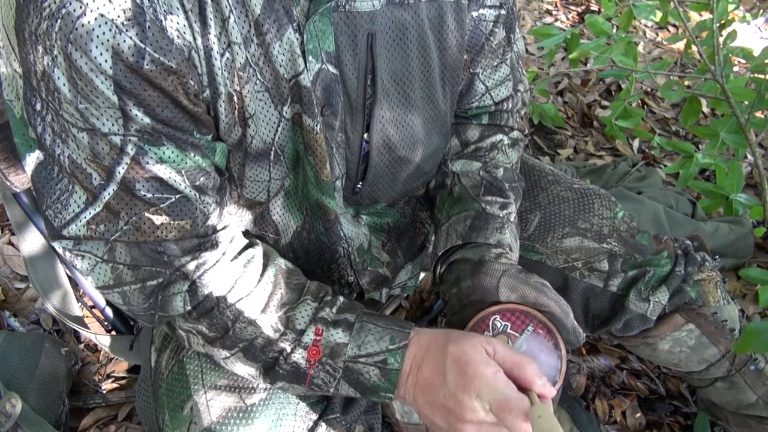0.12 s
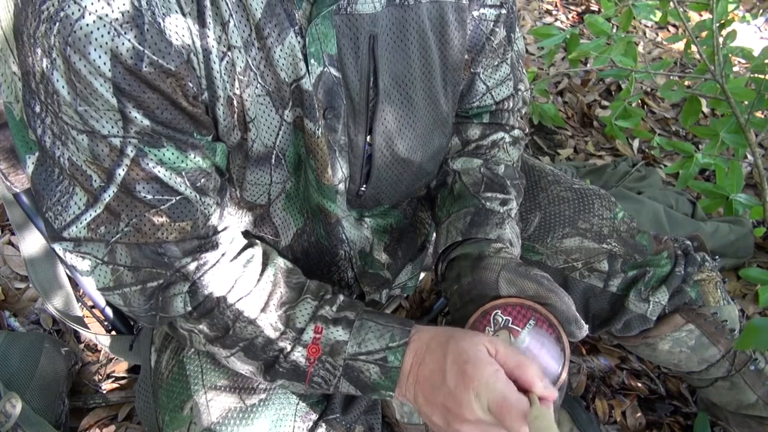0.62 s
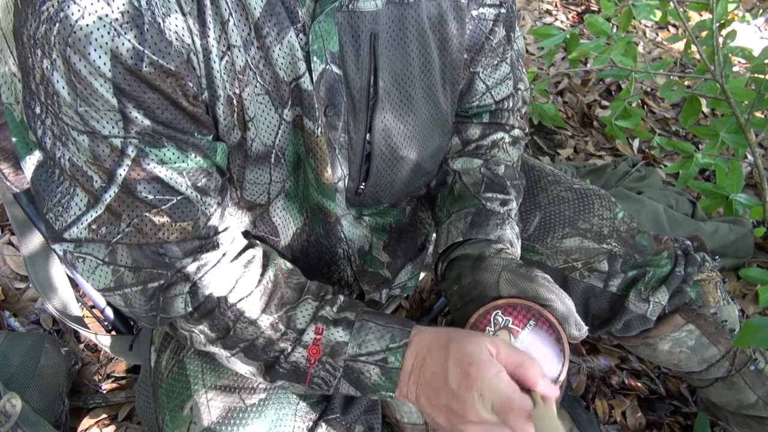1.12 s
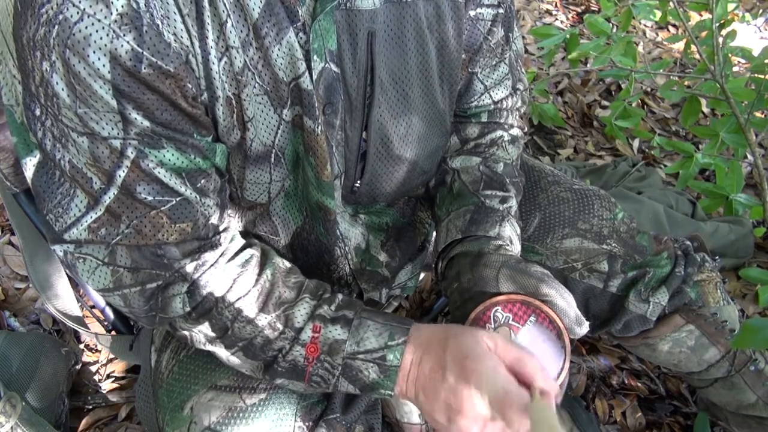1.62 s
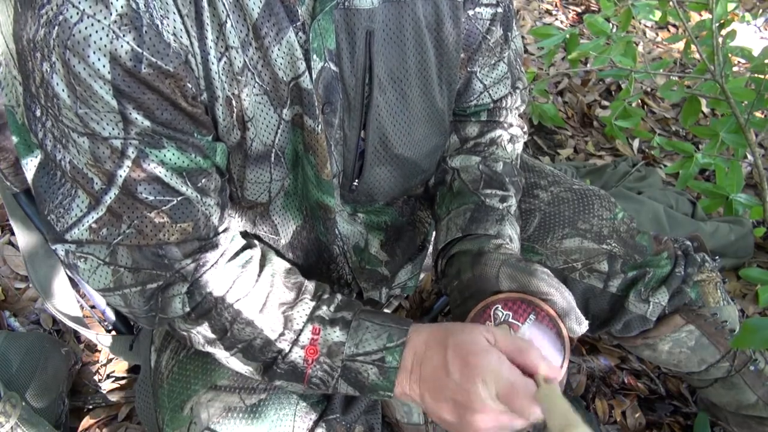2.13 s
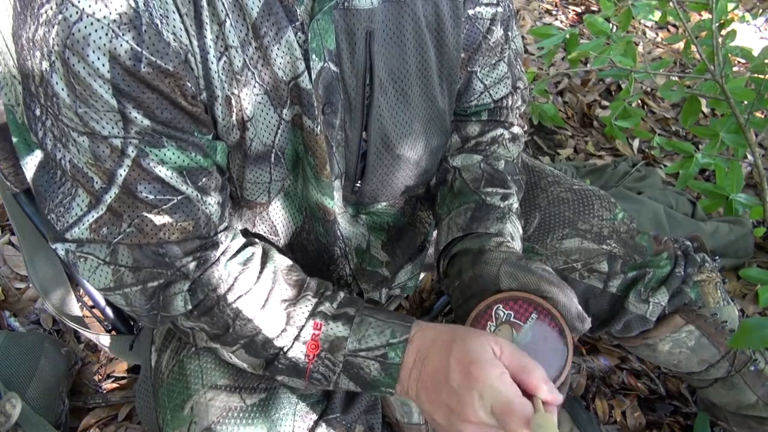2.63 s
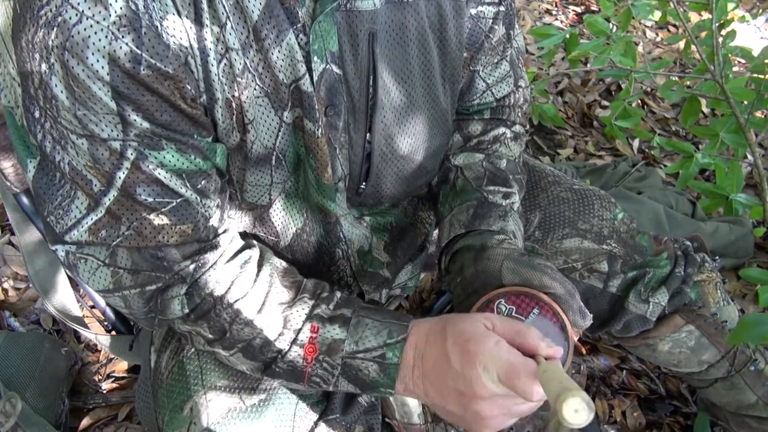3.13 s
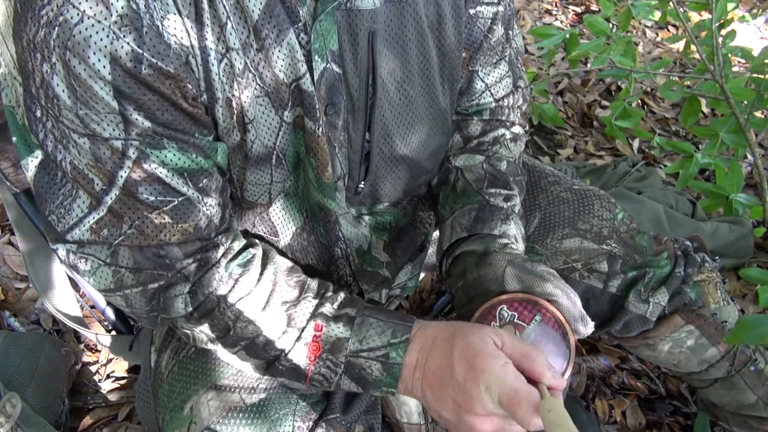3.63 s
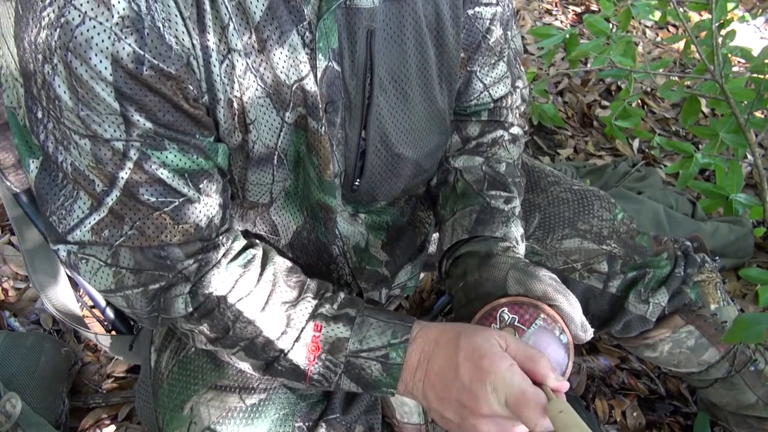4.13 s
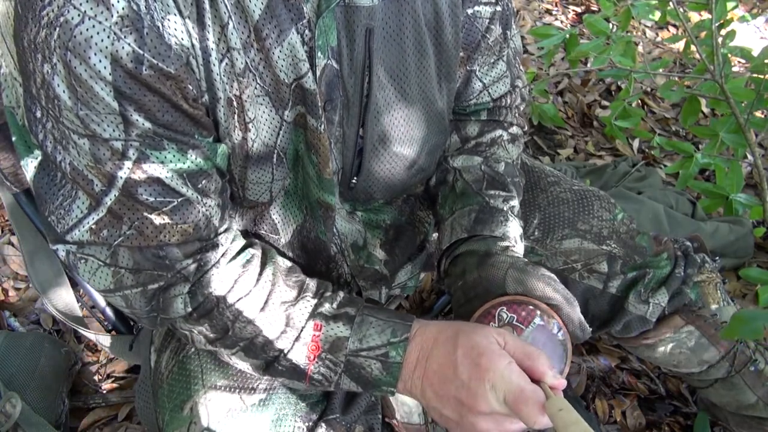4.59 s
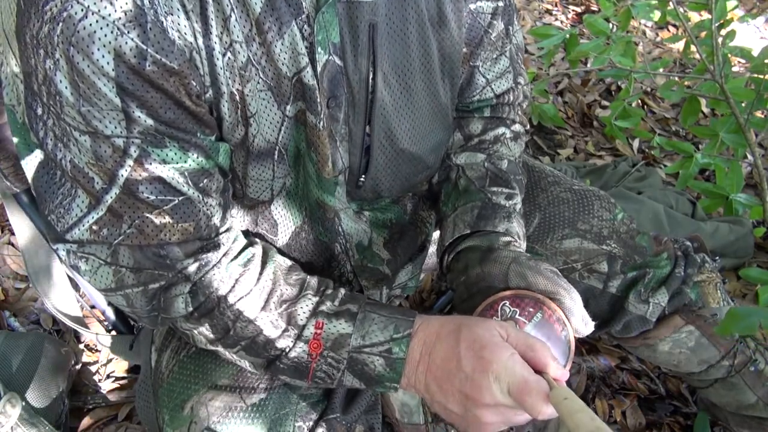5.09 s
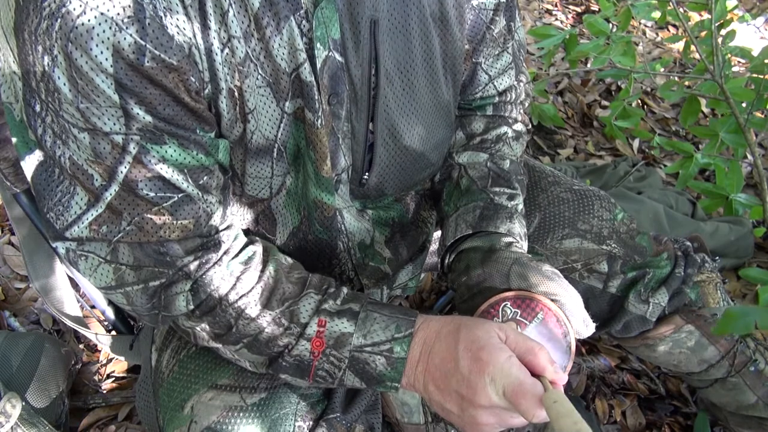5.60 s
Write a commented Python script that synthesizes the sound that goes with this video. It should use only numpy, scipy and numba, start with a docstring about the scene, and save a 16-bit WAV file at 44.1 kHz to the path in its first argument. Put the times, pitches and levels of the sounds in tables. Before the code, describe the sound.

A run of nasal, gritty turkey yelps from a scraped pot call, about three a second, the first longer and fuller, later ones shorter and softer. Light dry scrapes link the strokes. Then quiet woodland, one clipped cluck, another pause, a second cluck and a faint brush. Close, dry pickup with faint leafy echo, dull onset thumps and faint insects.

```python
"""Eleven yelps, then two short clucks, from a wooden striker drawn over the plate of a friction pot, in woods.
Each yelp is a brief high note, a drop to a low note and an upward lift: stick-slip pulses that ring the pot.
From the first yelp on, the tip scrapes softly on its return strokes, now and then catching for an instant.
Among the yelps comes one soft low hoot; after the second cluck, a last light brush of the tip.
Insects, rustle, leaf wash and a low breeze run throughout, and a limiter ducks them under loud notes."""
import sys
import numpy as np
from scipy import signal
from scipy.fft import rfft, irfft
from scipy.io import wavfile
from scipy.ndimage import uniform_filter1d
from numba import njit

SR = 44100
rng = np.random.default_rng(int(sys.argv[2]) if len(sys.argv) > 2 else 0)


def gain_from_db(level_db):
    """Turn a decibel level (scalar or array-like) into a linear amplitude factor."""
    decades = np.asarray(level_db, float) / 20
    return 10 ** decades


def unload_wav(signal):
    """Save mono or channel-first audio to the path in sys.argv[1] as 16-bit WAV at rate SR, clipped to [-1, 1]."""
    wavfile.write(
        sys.argv[1],
        SR,
        np.round(np.clip(np.atleast_2d(signal).T, -1, 1) * 32767).astype(np.int16),
    )


N = 252693


def evened(x):
    """Normalisation by root mean square: scales to rms 1."""
    return x / np.sqrt(np.mean(x ** 2) + 1e-20)


def add(mix, s, sound):
    """Superposition: mixes a sound in at s seconds."""
    part = mix[round(s * SR):][:len(sound)]
    part += sound[:len(part)]


def curve(rows):
    """Envelope: rows of (s, dB), linear in decibels between, become a gain for every sample."""
    s, db = np.transpose(rows)
    return gain_from_db(np.interp(np.arange(N) / SR, s, db))


def coloured(size, shape):
    """Filtered noise: white noise takes the spectrum shape(hz), at rms 1."""
    hz = np.fft.rfftfreq(size, 1 / SR)
    white = rng.standard_normal(size)
    return evened(irfft(rfft(white) * shape(hz), size))


def wander(size, hz):
    """Low-pass random fluctuation: slow chance up to about hz, at rms 1."""
    return coloured(size, lambda f: 1 / (1 + (f / hz) ** 2))


def spectrum(points):
    """Spectral envelope: a gain from (Hz, dB) points, linear in decibels over log frequency."""
    f, db = np.transpose(points)
    return lambda hz: gain_from_db(np.interp(np.log(hz + 1), np.log(f + 1), db))


def bump(t, s, half):
    """Gaussian window: a soft-edged hill of height 1 round s."""
    return np.exp(-abs((t - s) / half) ** 2)


# Stretches where slips pair up strong-weak.
# Each row: middle in seconds, half length in seconds, level of the half lines in dB.
PAIRED_SLIPS = [(0.105, 0.014, -8), (.520, .025, -21.5), (0.839, 0.033, 8.5), (1.174, 0.038, 6.5),
                (1.505, 0.018, 7.5), (1.84, .035, -16)]
# Moments where the stroke hurries, drags or falters.
# Each row: middle in seconds, half length in seconds, change of pitch in Hz, change of level in dB.
STROKE_WOBBLES = [(0.051, 0.02, 19, 3), (0.103, 0.017, -24, 1.5), (0.121, .01, 4, 3.0),
                  (.4355, 0.0014, -31.5, -12), (0.452, .011, 119.5, -1.5), (0.563, .014, 3.0, 2),
                  (0.829, 0.041, 14, 0), (.918, 0.01, 5.0, 3.5)]


def stroke(touch, drop, lift, end, low_hz, level_db, high_hz, lift_s, rasp_db, tilt_db):
    """Control of stick-slip by pressure and speed: time, level, slip rate, pairing, rasp, brightness."""
    t = np.arange(touch, end, 1 / SR)
    since, after, lifted = t - touch, np.maximum(t - drop, 0), np.maximum(t - lift, 0)
    off = lifted / (end - lift)  # share of the lift completed

    # strokes under -6.5 dB drop and settle more slowly, by a factor up to 3.5
    slow = np.clip(1 + 0.45 * (-6.5 - level_db), 1, 3.5)
    high = np.exp(-after / (0.0011 * slow))  # share of the high note left after the drop

    # the touch starts sharp, the low note settles from above, the lift climbs
    high_note_hz = high_hz + 118.1 * np.exp(-since / 0.004)
    low_note_hz = low_hz + 45 * np.exp(-after / (0.011 * slow))
    climb_s = min(max(0.92 * (end - lift), lift_s), 1.38 * lift_s)
    climb_hz = 262 * np.minimum(lifted / climb_s, 1) ** 1.85
    wobble_hz = sum(d * bump(t, s, h) for s, h, d, _ in STROKE_WOBBLES)
    hz = high * high_note_hz + (1 - high) * low_note_hz + climb_hz + wobble_hz

    touch_db = -35.5 * np.maximum(1 - since * slow ** 0.4 / 0.0078, 0) ** 1.2
    high_note_db = 5.0 - 190 * since
    low_note_db = 4 * np.exp(-after / 0.013) - 45 * after
    wobble_db = sum(d * bump(t, s, h) for s, h, _, d in STROKE_WOBBLES)
    lift_db = -16.5 * off ** 1.9 - 10.5 * off ** 10.0
    db = level_db + touch_db + high * high_note_db + (1 - high) * low_note_db + wobble_db + lift_db

    # every second slip is unlike: a little always, more just after the drop and in the paired stretches
    pair = gain_from_db(-38) + gain_from_db(-9) * (t > drop) * np.exp(-after / 0.015)
    pair = pair + sum(gain_from_db(d) * bump(t, s, h) ** 2 for s, h, d in PAIRED_SLIPS)

    rasp_s = 0.0063
    touch_rasp_db = 8 * np.exp(-since / rasp_s)
    drop_rasp_db = 14 * np.exp(-abs(t - drop) / rasp_s)
    rasp_db = rasp_db + touch_rasp_db + drop_rasp_db + 5.5 * off

    # soft strokes are duller, above all at the touch; the lift dulls too
    tilt_per_db = 0.18 + 0.36 * np.exp(-since / 0.03)
    tilt_db = tilt_db - 2 * off ** 3.5 + min(level_db, 0) * tilt_per_db
    return t, db, hz, 20 * np.log10(pair), rasp_db, tilt_db


# The yelping strokes. Each row: touch in seconds, drop to the low note in seconds,
# start of the lift in seconds, end in seconds, low note in Hz.
YELP_STROKES = [(.0378, .0432, .1625, .1822, 681), (.4278, .4332, .549, .5872, 707),
                (.7838, .7892, .905, .9352, 713), (1.1258, 1.1322, 1.217, 1.2582, 712.7),
                (1.4615, 1.4702, 1.537, 1.5772, 714.7), (1.7825, 1.8032, 1.867, 1.9072, 736),
                (2.1095, 2.1312, 2.171, 2.2142, 744), (2.4262, 2.4512, 2.487, 2.5282, 749),
                (2.7290, 2.7572, 2.801, 2.8462, 761), (3.0622, 3.0862, 3.122, 3.1662, 749),
                (3.3742, 3.3962, 3.435, 3.4822, 761)]
# The clucking strokes. Each row: touch in seconds, drop to the low note in seconds,
# start of the lift in seconds, end in seconds, low note in Hz.
CLUCK_STROKES = [(4.3016, 4.3072, 4.312, 4.328, 716), (5.1312, 5.1375, 5.1412, 5.1565, 701)]


def strokes():
    """Pressure raises level and pitch together in yelps; clucks are short hard jabs of fixed level."""
    for *times, low_hz in YELP_STROKES:
        level_db = -4.5 + 0.2046 * (low_hz - 751.8)
        high_hz = 1081.7 + 7.5 * level_db
        yield stroke(*times, low_hz, level_db, high_hz, lift_s=0.032, rasp_db=-29.5, tilt_db=-0.6)
    for row in CLUCK_STROKES:
        yield stroke(*row, level_db=-2.5, high_hz=857, lift_s=0.008, rasp_db=-24.5, tilt_db=1.8)


# Modes that plate and pot ring with.
# Each row: frequency in Hz, width in Hz (pot() widens narrow ones), level in dB.
POT_MODES = [(795, 100, -12.5), (937, 150, -7), (1502, 214, 7.5), (1985, 388, -0.5), (1964, 125, -0.5),
             (2659, 160, -2.5), (3176, 320, -10), (3677, 49, -13.5), (4185, 140, -4.5), (5050, 30, -14.5),
             (5460, 340, -15), (6450, 360, -16.5), (6657, 210, -16), (8780, 360, -18), (9700, 490, -19.5),
             (11110, 120, -20), (12100, 900, -23.5)]
# Where two modes of the plate cancel.
# The one row: frequency in Hz, width of the floor in Hz, width of the rim in Hz.
MODE_HOLE = (2285, 180, 270)


def pot(hz, contact_hz=4500):
    """Modal superposition: a complex response whose neighbouring modes alternate in sign."""
    least_hz = 140  # the hand round the pot damps every mode at least this wide
    modes = 0
    for k, (f, width, db) in enumerate(POT_MODES):
        damping = hz * max(width, least_hz)
        modes = modes + (-1) ** k * gain_from_db(db) * damping / (f ** 2 - hz ** 2 + 1j * damping)
    f, floor, rim = MODE_HOLE
    modes = modes * (f ** 2 - hz ** 2 + 1j * hz * floor) / (f ** 2 - hz ** 2 + 1j * hz * rim)
    blunt_tip = 1 / (1 + 1j * hz / contact_hz) ** 2  # dulls the treble
    return modes * blunt_tip / (1 + (hz / 19000) ** 4)


def note(t, db, hz, half_db, rasp_db, tilt_db):
    """Stick-slip excitation of a resonator: slip pulses and gritty rasp drive the pot, which rings on."""
    longest = 8192  # samples

    def drift(rate_hz):
        return wander(longest, rate_hz)[:len(t)]

    # a raspy stroke also slips early or late, which smears the upper lines
    turns = np.cumsum(hz) / SR + 0.18 * gain_from_db(rasp_db) * drift(270)

    # the fundamental is thin in the high note; as the grip fades the slip rounds off towards a sine
    fading = np.maximum(np.quantile(db, 0.7) - db, 0) * (t > t[db.argmax()])
    above_lowest = (hz - hz.min()) * (t < t[hz.argmin()])
    first_db = -7.0 + 0.68 * fading - 0.017 * above_lowest

    slips, power = 0, 0
    for k in np.arange(1, 19, 0.5):  # harmonics, and half lines between them
        octaves = max(np.log2(k / 2), 0)
        size = gain_from_db(np.clip(tilt_db, -12, 3) * octaves + 1.9 * octaves * drift(64))
        if k == 1:
            size = size * gain_from_db(first_db)
        if k % 1:  # unlike pairs of slips add half lines
            size = size * gain_from_db(half_db - 6.5 * octaves) * min(k / 2.5, 1) ** 6.1
        lag = 0.11 * octaves ** 2 * drift(170)  # radians: no two slips have quite the same shape
        slips = slips + size * np.cos(2 * np.pi * k * turns + lag) * (k * hz < SR / 2.5)
        power = power + abs(size * pot(k * hz)) ** 2 / 2

    # a burst of grit at each slip, dying away over about half a cycle
    burst = np.exp(-(turns % 1) / 0.53)
    grit = rng.standard_normal(longest)[:len(t)] * burst * gain_from_db(1.5 * drift(170))
    grit = signal.lfilter([1, -0.58], [1], grit)  # fine grains lean to the treble

    # dividing by a power of the ringing power partly evens the level as lines cross modes
    drive = (slips + 9.4 * gain_from_db(rasp_db) * evened(grit)) * gain_from_db(db) / power ** 0.35
    drive *= np.minimum((t - t[0]) / 0.002, 1)  # the tip takes a moment to grip
    size = len(t) + 2048  # room for the ringing
    return t[0], irfft(rfft(drive, size) * pot(np.fft.rfftfreq(size, 1 / SR)), size)


def echo_of(call):
    """Diffuse reflection: a faint short echo off leaves and ground, as decaying noise convolved in."""
    t = np.arange(SR // 3) / SR
    decay = gain_from_db(-60 * t / 0.28) * (t > 0.003)  # 60 dB in 0.28 s
    tail = np.diff(rng.standard_normal(len(t)) * decay, 2)  # differencing twice brightens it
    return gain_from_db(-17) * signal.fftconvolve(call, tail / np.linalg.norm(tail))[:N]


# The tip dragged back without gripping, and a last light brush.
# Each row: loudest moment in seconds, level there in dB, half length in seconds.
RETURN_SCRAPES = [(0.295, -53.5, .09), (0.665, -51, 0.073), (1.006, -49, 0.059), (1.315, -48.5, 0.084),
                  (1.665, -48.5, 0.059), (1.982, -48, 0.062), (2.298, -48, 0.046), (2.612, -45.5, .05),
                  (2.923, -46.5, .055), (3.257, -45.5, 0.048), (3.6, -51, 0.072), (5.61, -55, 0.041)]


def scrape():
    """Friction noise through a resonator: fine uneven grit rings the damped pot."""
    t = np.arange(N) / SR
    # 9 dB down at half a length from the loudest point
    drag = sum(gain_from_db(db - 9 * ((t - s) / half) ** 2) for s, db, half in RETURN_SCRAPES)
    # the dragging tip damps the plate, which flattens the response by the power 0.6
    grit = coloured(N, lambda hz: abs(pot(hz)) ** 0.6 / (1 + (hz / 12000) ** 6))
    return drag * evened(grit * gain_from_db(1.5 * wander(N, 150)))


# The tip catches for an instant. Each row: start in seconds, peak level in dB.
TIP_CATCHES = [(1.0069, -31.5), (2.28, -33), (2.3041, -34.5), (2.5955, -34), (2.93, -39.5), (3.2495, -38),
               (4.5496, -67)]


def catches():
    """Impulse response: each single slip rings the pot once."""
    ring = irfft(pot(np.fft.rfftfreq(2048, 1 / SR)))
    out = np.zeros(N)
    for s, db in TIP_CATCHES:
        add(out, s, gain_from_db(db) * ring / abs(ring).max())
    return out


# One soft low hoot. Each row: time in seconds, pitch in Hz, rms level in dB.
HOOT_GLIDE = [(1.34, 216, -90), (1.356, 215, -52), (1.406, 298, -49), (1.48, 259, -48.5)]


def hoot():
    """Frequency modulation of a sine: the pitch rises quickly, then sinks part of the way back."""
    s, hz, db = np.transpose(HOOT_GLIDE)
    t = np.arange(s[0], s[-1], 1 / SR)
    turns = np.cumsum(np.interp(t, s, hz)) / SR
    return s[0], np.sqrt(2) * gain_from_db(np.interp(t, s, db)) * np.sin(2 * np.pi * turns)


# Resonant bands of the insect choruses. Each row: centre in Hz, width in Hz.
INSECT_BANDS = [(8200, 701), (4366, 502.5)]
# Loudness of the choruses, one list for each band. Each row: time in seconds, level in dB.
INSECT_LEVELS = [
    [(0.0, -76), (1.7, -69.5), (2.4, -72.5), (5.73, -74.5)],
    [(0.0, -77.5), (1.0, -69), (2.6, -74), (4.76, -80), (4.9, -70), (5.73, -75)],
]


def insects():
    """Narrow-band noise: each chorus is a resonance-shaped band that shimmers in level."""
    out = np.zeros(N)
    for (hz, width), rows in zip(INSECT_BANDS, INSECT_LEVELS):
        band = coloured(N, lambda f: 1 / (1 + (2 * (f - hz) / width) ** 2))
        out += curve(rows) * gain_from_db(0.85 * wander(N, 8.0)) * band
    return out


# Loudness of the cloth and leaf rustle. Each row: time in seconds, level in dB.
RUSTLE_LEVEL = [(0.0, -69.5), (1.1, -70), (1.55, -64), (1.8, -73), (3.2, -72.5), (3.6, -64.5), (4.05, -64),
                (4.4, -74.5), (4.85, -80), (5.05, -64), (5.73, -70.5)]
# Spectrum of the rustle. Each row: frequency in Hz, relative density in dB per Hz.
RUSTLE_SPECTRUM = [(300, -15.5), (1000, -0.5), (3000, 6), (6000, -1), (10500, -3.5), (12500, -7.5),
                   (14500, -23.5)]


def rustle():
    """Amplitude-modulated noise: quick chance swings of level make it crackly."""
    return curve(RUSTLE_LEVEL) * gain_from_db(1.2 * wander(N, 30)) * coloured(N, spectrum(RUSTLE_SPECTRUM))


# Spectrum of the far leaves. Each row: frequency in Hz, relative density in dB per Hz.
WASH_SPECTRUM = [(88, -44.5), (150, -15.5), (436, -4), (481, -5.5), (607, -3.5), (860, -5.5), (1480, -12.5),
                 (2600, -21.5), (4650, -31.5), (6600, -35), (8170, -28.5), (15500, -63.5)]


def leaf_wash():
    """Broadband noise: many far leaves sum to a slowly swelling wash."""
    return gain_from_db(-56 + 1.0 * wander(N, 3.1)) * coloured(N, spectrum(WASH_SPECTRUM))


# Loudness of a low breeze on the microphone. Each row: time in seconds, level in dB.
BREEZE_LEVEL = [(0.0, -69), (1.4, -67), (2.0, -71), (5.3, -69), (5.73, -64)]


def breeze(low_hz=45, high_hz=200):
    """Band-limited turbulence noise: a lumpy low rumble between two corner frequencies."""
    rumble = coloured(N, lambda f: (f / low_hz) ** 2 / (1 + (f / low_hz) ** 2) / (1 + (f / high_hz) ** 2))
    return curve(BREEZE_LEVEL) * gain_from_db(2.0 * wander(N, 12)) * rumble


def scene():
    """Linear superposition: notes and their echo, tip noises and hoot over the woods."""
    call = np.zeros(N)
    for controls in strokes():
        add(call, *note(*controls))
    mix = call + echo_of(call) + scrape() + catches()
    add(mix, *hoot())
    mix += insects() + rustle() + leaf_wash() + breeze()
    return mix[None]


# The baseline sags at hard onsets. Each row: start in seconds, size in dB.
BASELINE_SAGS = [(1.472, -51), (2.114, -34.5), (2.435, -34.5), (3.071, -32.5), (3.383, -34), (4.306, -33.5),
                 (5.138, -35)]


def thumps():
    """Exponential relaxation: a quick negative shift that recovers slowly is heard as a dull thump."""
    t = np.arange(SR // 2) / SR
    sag = -(1 - np.exp(-t / 0.00043)) * np.exp(-t / 0.045)
    out = np.zeros(N)
    for s, db in BASELINE_SAGS:
        add(out, s, gain_from_db(db) * sag)
    return out


@njit
def duck(level_db, knee_db, quiet_db, attack, hold, release):
    """Gain control with hysteresis: the cut follows the excess fast, holds while sound lasts, then lets go."""
    cut, now, wait = np.zeros(len(level_db)), 0., 0.
    for i in range(len(level_db)):
        now += max(level_db[i] - knee_db - now, 0.) * attack
        wait = hold if level_db[i] > quiet_db else wait - 1
        if wait < 0:
            now -= now * release
        cut[i] = now
    return cut


def limited(x):
    """Look-ahead limiting: the mean power of the coming 2 ms sets the cut."""
    power = abs(uniform_filter1d(x ** 2, size=88, origin=-43))
    level_db = 10 * np.log10(power + 1e-12)
    attack, hold, release = 1 / (0.0005 * SR), 0.035 * SR, 1 / (0.0081 * SR)  # per sample, samples, per sample
    return x * gain_from_db(-duck(level_db, -11, -20, attack, hold, release))


def band_limit(x):
    """A steep low-pass at the top of the band."""
    return signal.sosfilt(signal.butter(12, 16250, fs=SR, output="sos"), x)


def record(dry):
    """Nonlinear pickup: the limiter acts first, then the baseline thumps are added."""
    out = limited(dry[0]) + thumps()
    return band_limit(out[None])


dry = scene()
out = record(dry)
unload_wav(out)
```